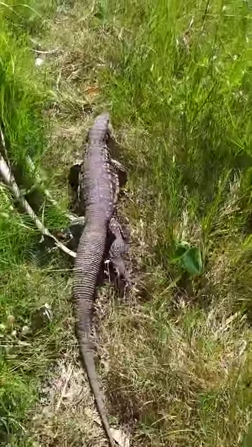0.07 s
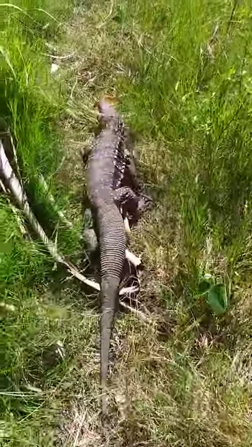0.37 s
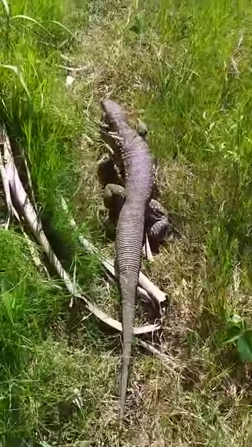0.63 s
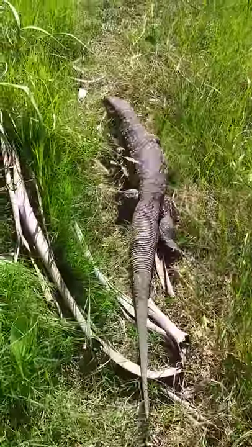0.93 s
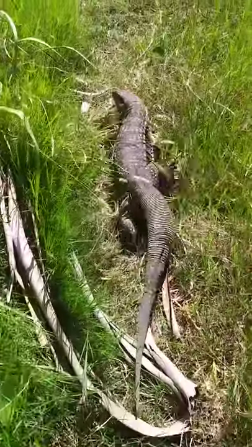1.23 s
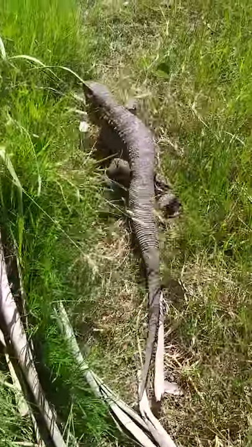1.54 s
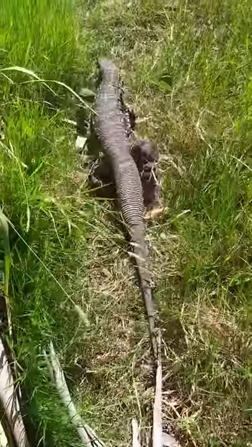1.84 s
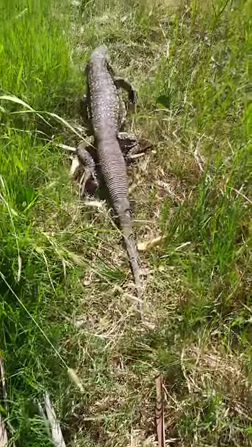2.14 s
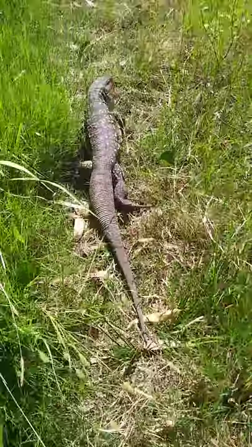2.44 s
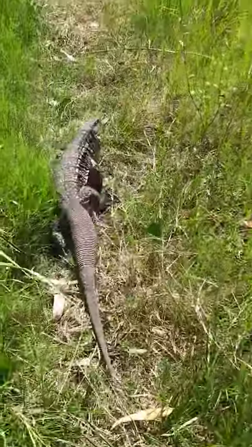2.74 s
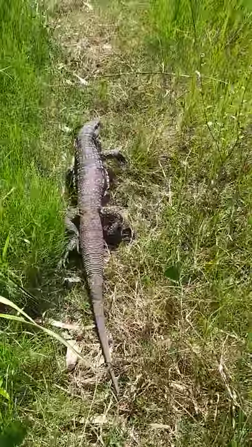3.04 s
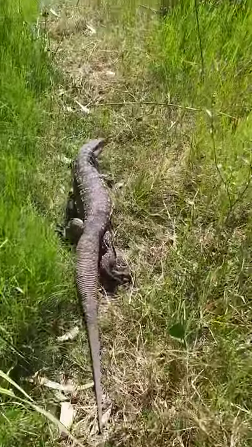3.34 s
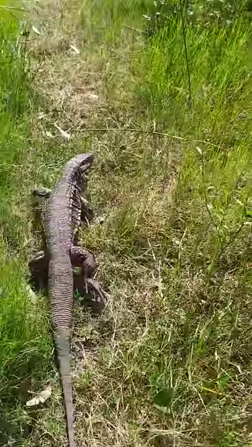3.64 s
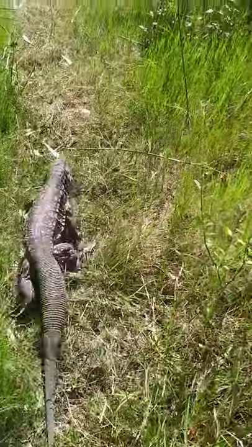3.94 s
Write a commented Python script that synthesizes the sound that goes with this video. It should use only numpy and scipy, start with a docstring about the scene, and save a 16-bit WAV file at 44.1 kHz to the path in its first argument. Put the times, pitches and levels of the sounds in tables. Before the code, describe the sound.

A large lizard rustles through dry grass, stalks snapping, while distant birds call.

```python
"""In dry grass outdoors, a large lizard walks just ahead of a hand-held microphone.
Its belly and tail drag over the blades, making thousands of tiny clicks that merge into a rustle.
Its feet pat the ground, grass crunches, and stalks and twigs snap. Far birds call in turn, smeared by
the trees, over outdoor hiss and a faint low hum."""
import sys
import numpy as np
from scipy import signal
from scipy.fft import rfft, irfft
from scipy.io import wavfile
from scipy.ndimage import uniform_filter1d

SR = 44100
rng = np.random.default_rng(int(sys.argv[2]) if len(sys.argv) > 2 else 0)


def master(y):
    """Save y as 16-bit WAV."""
    cut = np.clip(np.atleast_2d(y).T, -1, 1)
    pcm = np.round(cut * 32767)  # scale
    wavfile.write(sys.argv[1], SR, pcm.astype(np.int16))


N = 176400  # 4 seconds


def undb(db):
    """Turn decibels into a number to multiply a sound by."""
    return 10 ** (np.asarray(db) / 20)


def unit(x):
    """Scale a sound so its average strength (rms) is 1."""
    return x / np.sqrt(np.mean(x ** 2) + 1e-20)


def curve(rows):
    """Join (time, value) rows by straight lines."""
    return np.interp(np.arange(N) / SR, *np.array(rows).T)


def walk(rate):
    """A smooth random wobble of size about 1 that changes about `rate` times a second."""
    span = max(int(SR / rate), 2)
    smoothed = uniform_filter1d(rng.standard_normal(N), span, mode="wrap")
    return unit(uniform_filter1d(smoothed, span, mode="wrap"))


def colour(x, points):
    """Turn low and high tones up or down by (frequency, level) points; the result has strength 1."""
    hz, db = np.array(points).T
    f = np.maximum(np.fft.rfftfreq(N, 1 / SR), 1)
    gain = undb(np.interp(np.log(f), np.log(hz), db))
    return unit(irfft(rfft(x) * gain, N))


def ring(x, hz, width):
    """Let through a band around hz; width is a share of hz, and narrow bands ring longer."""
    w = 2 * np.pi * min(hz, SR / 2 - 1) / SR
    a = np.sin(w) * width / 2
    return signal.lfilter([a, 0, -a], [1 + a, -2 * np.cos(w), 1 - a], x)


def add(out, start, x):
    """Mix x into out at a time in seconds."""
    i = max(int(start * SR), 0)
    out[i:i + len(x)] += x[:max(N - i, 0)]


def outdoor_hiss():
    """A soft, nearly steady hiss."""
    # tone of the hiss: f/Hz, level/dB
    tone = [(25, -26), (55, 1), (80, 0), (115, 3.5), (170, -1), (360, -3.5), (900, -1.5), (1670, -1),
            (2430, -4.5), (3950, 1), (5030, -5), (6770, -4.5), (7800, -10.5), (9000, -7), (10400, 1.5),
            (11500, -5), (12900, -9.5), (14200, -7.5), (15600, -5)]
    # loudness of the hiss: t/s, level/dB
    loudness = [(0, -46.5), (1.1, -48), (1.9, -47.5), (2.15, -46), (2.6, -47.5), (4, -48)]
    return colour(rng.standard_normal(N), tone) * undb(curve(loudness) + .5 * walk(19))


def low_hum(hz=129.4):
    """A faint wavering hum, with a weaker tone an octave below."""
    low_phase = np.pi * np.cumsum(hz * (1 + .0338 * walk(15))) / SR
    hum = undb(-69) * unit(np.sin(2 * low_phase)) + undb(-73) * unit(np.sin(low_phase))
    return hum * unit(undb(2.2 * walk(22)))


def distant_chorus(flicker_db=2):
    """Many very distant birds blur into one soft band of noise."""
    # tone of the chorus: f/Hz, level/dB
    tone = [(700, -34.5), (1150, -13.5), (1500, -11), (1720, -11), (2050, -22), (4000, -53)]
    # loudness of the chorus: t/s, level/dB
    loudness = [(0, -75), (2.5, -61), (2.8, -56), (3.15, -56.5), (3.5, -58.5), (4, -55.5)]
    return colour(rng.standard_normal(N), tone) * undb(curve(loudness) + flicker_db * walk(21))


def bird(calls, third_db, rise_s=.026, fall_s=.068):
    """Each cry swells as it slides up, holds and slides down; fast shaking of the pitch makes it rasp."""
    out = np.zeros(N)
    rasp, waver = np.minimum(walk(520), 1), .008 * walk(70)
    fade_in, fade_out = .27, .042  # shares of the cry's length
    for start, length, hz, db, rise, fall, low_db, shake in calls:
        progress = np.linspace(0, 1, int(length * SR))
        at = (int(start * SR) + np.arange(len(progress))) % N
        ending = np.clip(1 - (1 - progress) * length / fall_s, 0, 1)
        sag = rise * np.exp(-progress * length / rise_s) + fall * np.sin(ending * np.pi / 2) ** 2
        pitch = hz * (1 - sag + shake * rasp[at] + waver[at])
        phase = 2 * np.pi * np.cumsum(pitch) / SR
        # three tones at 1, 2 and 3 times the pitch; the second is the loudest
        voice = undb(low_db) * np.sin(phase) + np.sin(2 * phase) + undb(third_db) * np.sin(3 * phase)
        swell = np.minimum(progress / fade_in, 1) * (1 - ending / 2)
        swell *= np.minimum((1 - progress) / fade_out, 1)
        add(out, start, undb(db) * unit(voice * swell))
    return out


def calling_birds():
    """One bird gives raspy cries that sink in pitch, and others answer."""
    # the nearer bird: t/s, length/s, f/Hz, level/dB, opening rise/share of f, final fall/share of f,
    # lowest tone/dB against the second, pitch shake/share of f
    cries = [(1.89, 0.16, 2263, -43, 0.025, 0.16, -9.5, 0.0432),
             (2.255, 0.24, 2284, -44.5, 0.051, 0.24, -19, 0.031),
             (2.665, .18, 2250, -44.5, 0.037, 0.096, -16, 0.041),
             (2.98, .215, 2181, -42, .14, .08, -17, 0.0241),
             (3.355, .095, 2030, -41.5, 0.045, .33, -12, 0.024),
             (3.6, 0.2, 1788, -48.5, .18, 0.17, -2, 0.0166),
             (3.78, 0.12, 1764, -44, 0.018, 0.29, -6.5, 0.035)]
    # lower, fainter answers: same columns
    answers = [(1.19, .24, 1197, -47, 0.061, 0.019, -17, 0.0595),
               (1.41, 0.14, 1210, -51.5, 0.019, .03, -29, 0.075),
               (1.63, .17, 863, -54, 0.018, 0.039, -26, .095),
               (2.11, 0.13, 1375, -53, .03, 0.078, -9, 0.051),
               (2.475, 0.14, 1500, -48, 0.051, 0.11, -27, 0.043),
               (2.83, 0.16, 1474, -48, 0.039, 0.065, -22, 0.021),
               (3.02, 0.17, 1867, -50.5, 0.0306, 0.102, -14, 0.0647),
               (3.23, 0.078, 1830, -47.5, 0.022, .24, -9.5, 0.0283),
               (3.44, 0.19, 1500, -54.5, 0.13, 0.018, -6, 0.026)]
    return bird(cries, third_db=-15) + bird(answers, third_db=-18)


def trees(x, echo_s=.85, echo_share=.76):
    """Trunks and leaves scatter far sounds into a blurred echo that fades by 60 dB in echo_s."""
    t = np.arange(SR) / SR
    tail = rng.standard_normal(SR) * np.exp(-np.log(1000) * t / echo_s)
    echo = signal.fftconvolve(x, tail / np.linalg.norm(tail))[:N]
    return np.sqrt(1 - echo_share) * x + np.sqrt(echo_share) * echo


def steps(knock_fade_s=.0037, thump_hz=213, thump_fade_s=.0017):
    """A foot lands: a dull knock in the dead leaves and a thump of soil."""
    # feet patting the ground: t/s, level/dB, knock f/Hz, thump/dB against the knock
    footfalls = [(0.084, -38.5, 724, -24), (0.14, -35, 704, -18), (.731, -46, 980, -18),
                 (2.002, -46.5, 450, 7), (2.116, -44, 710, -6), (2.451, -45, 736, 5),
                 (2.536, -39, 350, -24), (2.543, -38.5, 1090, 2.5), (3.760, -39.5, 1180, 4),
                 (3.865, -39.5, 745, 7)]
    out, t = np.zeros(N), np.arange(SR // 10) / SR
    for start, db, hz, thump_db in footfalls:
        band = ring(rng.standard_normal(len(t)), hz, width=.34)
        knock = unit(ring(band, hz, width=3.7)) * np.exp(-t / knock_fade_s)
        thump = np.sin(2 * np.pi * thump_hz * t) * np.exp(-t / thump_fade_s)
        add(out, start, undb(db) * (knock + undb(thump_db) * thump))
    return out


def crunches(cracks_per_s=3500):
    """Grass crunches or a twig cracks and knocks: each is a short swell of tiny cracks."""
    # short crunches of grass, and the crack and knock of a twig: t/s, level/dB, f/Hz, length/s
    bursts = [(0.018, -35, 3730, 0.008), (0.074, -37, 2900, 0.01), (.139, -40, 3500, 0.0081),
              (.153, -36, 3900, 0.0042), (0.436, -44, 2560, 0.012), (0.728, -45.5, 2280, 0.012),
              (0.853, -40, 4130, 0.005), (0.947, -33.5, 2900, 0.004), (1.9662, -36.5, 885, 0.0032),
              (1.9664, -29, 3230, 0.0017), (2.12, -44, 3500, 0.0043), (2.538, -41, 6000, 0.013),
              (3.166, -42.5, 1660, 0.018), (3.165, -45, 5900, 0.04), (3.207, -38.5, 4400, 0.0055),
              (3.337, -37, 8400, 0.0087), (3.894, -40, 2400, 0.0037)]
    out, t = np.zeros(N), np.arange(SR // 10) / SR
    for start, db, hz, length in bursts:
        cracks = rng.standard_normal(len(t)) * (rng.random(len(t)) < cracks_per_s / SR)
        crunch = ring(ring(cracks, hz, width=.55), hz, width=1)
        age = t / (length / 3)  # the swell is loudest at age 1
        add(out, start, undb(db) * unit(crunch) * age * np.exp(1 - age))
    return out


def snaps(splinter_gain=.78, body_hz=5800, body_db=-29):
    """A stalk breaks: a very short bright ring with splinters."""
    # dry stalks and twigs breaking: t/s, level/dB, f/Hz, fade time/s
    stalks = [(0.9212, -24, 3300, .0008), (1.0662, -24, 3460, 0.00082), (1.2553, -18, 2400, .0009),
              (1.2918, -25, 3400, .001), (1.8256, -26.5, 10700, .00084), (1.967, -24, 860, .0009),
              (1.9664, -16, 2840, 0.00048), (1.9682, -25, 10500, .0009), (2.24, -31, 4070, .00033),
              (2.544, -18, 10030, 0.0033), (2.5472, -21, 9700, .00048), (2.728, -24.5, 11040, 0.0018),
              (3.204, -31, 6230, .0015), (3.232, -29, 9800, .0004), (3.2785, -18, 9460, .0011),
              (3.341, -28, 10660, .0022), (3.372, -28, 9300, .001), (3.491, -18, 9120, 0.00084),
              (3.594, -23.5, 9800, 0.0014), (3.621, -31, 9700, 0.0023), (3.6495, -31, 10100, .002)]
    out, t = np.zeros(N), np.arange(SR // 50) / SR
    for start, db, hz, fade_s in stalks:
        fade = np.exp(-t / fade_s)
        splinters = rng.standard_normal(len(t)) * fade
        ping = np.sin(2 * np.pi * hz * t) * fade / 2
        tone = ring(ping + splinter_gain * splinters, hz, width=.25)
        body = 2 * ring(ring(splinters, body_hz, width=.85), body_hz, width=.85)
        add(out, start, undb(db) * (tone + undb(body_db) * body))
    return out


def slipping_blades(clicks_per_s=5400, spread_db=2.5):
    """Grass blades slip with many tiny clicks, a few much louder than the rest."""
    hit = rng.random(N) < clicks_per_s / SR
    size = undb(spread_db * np.minimum(rng.exponential(size=N), 5.5))
    return hit * size * rng.choice([-1, 1], N)


def rustle(flutter_db=2, flutter_per_s=63):
    """Belly and tail slide over the grass in fluttering spurts."""
    # tone of the dragging body and of its crisp treble: f/Hz, level/dB
    drag_tone = [(300, -22.5), (800, -3.5), (1600, -3), (2400, 8), (3000, 0), (4200, 2.5), (5500, -1.5),
                 (6800, -8.5), (7800, -32), (16000, -13)]
    crisp_tone = [(3000, -28.5), (6600, -8.5), (7800, -14.5), (9300, -5), (10300, -2), (11500, -7),
                  (13200, -21), (15600, -25)]
    # loudness of each: t/s, level/dB
    drag_loudness = [(0, -40.5), (.09, -48.5), (.22, -55), (.33, -51), (.42, -46.5), (.5, -51), (.58, -46),
                     (.68, -51.5), (.8, -51), (.95, -46), (1.03, -48), (1.14, -49), (1.36, -46), (1.5, -49),
                     (1.63, -53.5), (1.74, -51.5), (1.88, -55.5), (2.1, -51.5), (2.3, -54), (2.7, -73),
                     (3.0, -56), (3.18, -53.5), (3.3, -57.5), (4, -63)]
    crisp_loudness = [(0, -44.5), (.23, -59.5), (.4, -49.5), (.66, -57), (.85, -51.5), (.94, -44.5),
                      (1.1, -57.5), (1.35, -48.5), (1.6, -55.5), (1.74, -53), (1.9, -56), (2.4, -53.5),
                      (2.64, -53.5), (2.74, -47.5), (2.86, -50), (2.96, -45.5), (3.06, -49), (3.18, -41),
                      (3.25, -50.5), (3.33, -46), (3.44, -54), (3.62, -49), (3.8, -50), (4, -54.5)]
    flutter = unit(undb(flutter_db * walk(flutter_per_s)))
    drag = colour(slipping_blades(), drag_tone) * undb(curve(drag_loudness))
    crisp = colour(slipping_blades(), crisp_tone) * undb(curve(crisp_loudness))
    return flutter * (drag + crisp)


def scene():
    """Everything reaches one microphone, so left and right are the same."""
    lizard = rustle() + snaps() + crunches() + steps()
    mono = lizard + trees(calling_birds()) + distant_chorus() + outdoor_hiss() + low_hum()
    return np.array([mono, mono])


def record(dry, low_cut_hz=46, top_hz=15750):
    """The recorder cuts the deep bass and the highest treble."""
    thin = signal.sosfilt(signal.butter(4, low_cut_hz, "high", fs=SR, output="sos"), dry)
    return signal.sosfilt(signal.ellip(10, .2, 70, top_hz, fs=SR, output="sos"), thin)


dry = scene()
out = record(dry)
master(out)
```